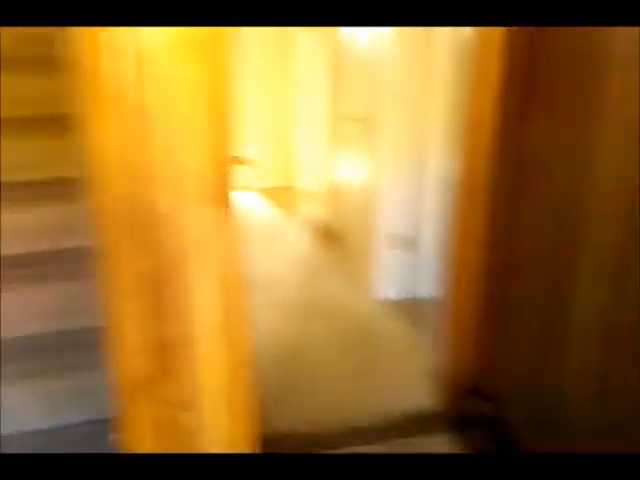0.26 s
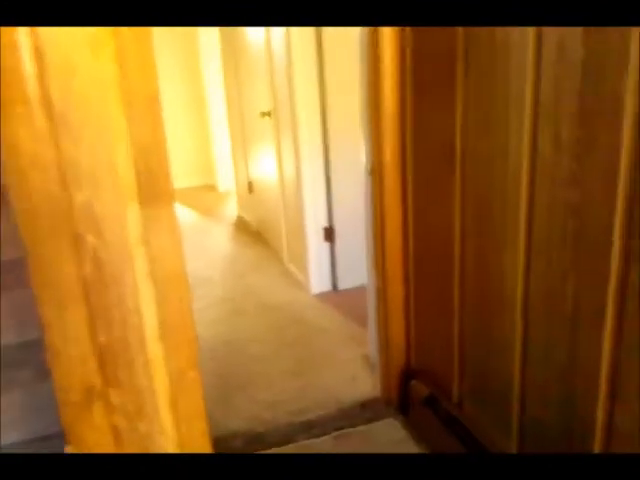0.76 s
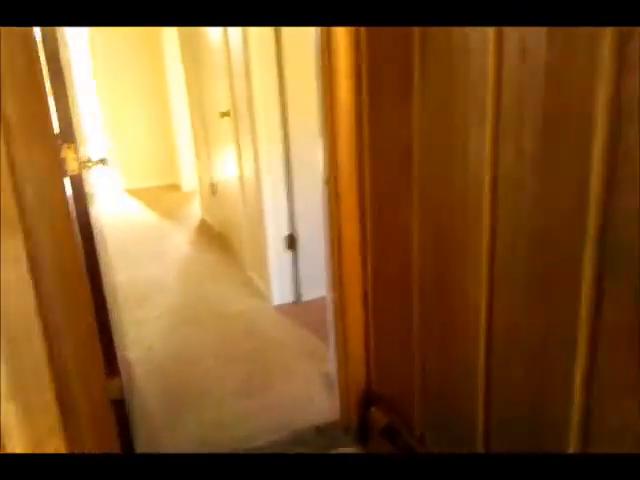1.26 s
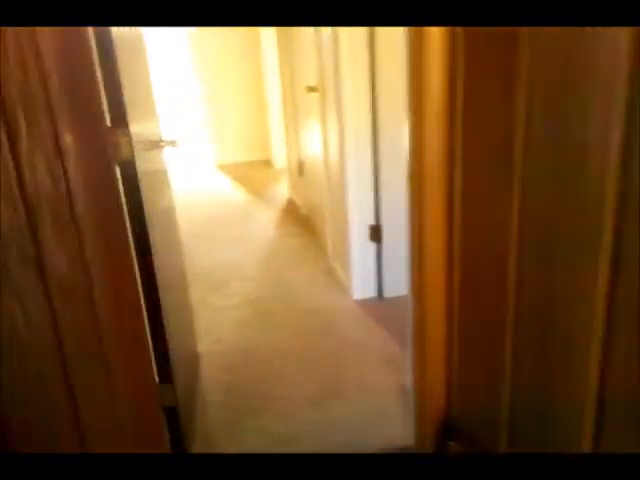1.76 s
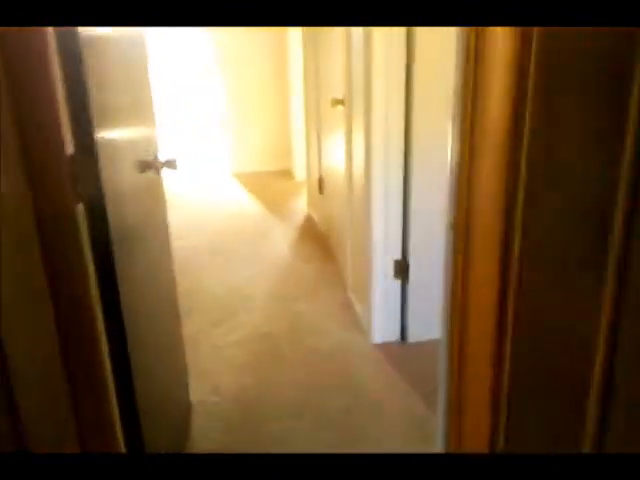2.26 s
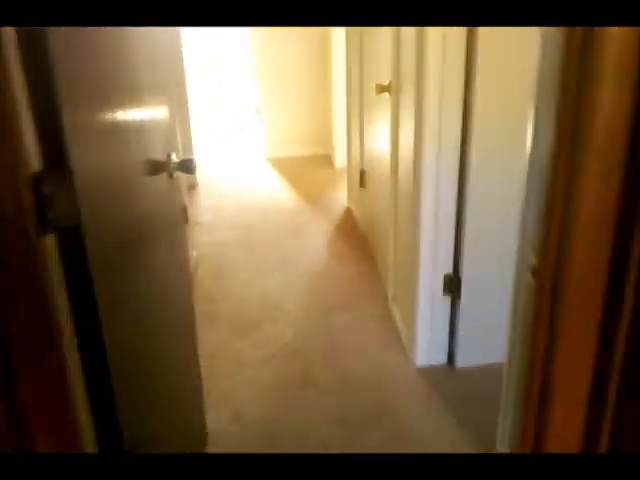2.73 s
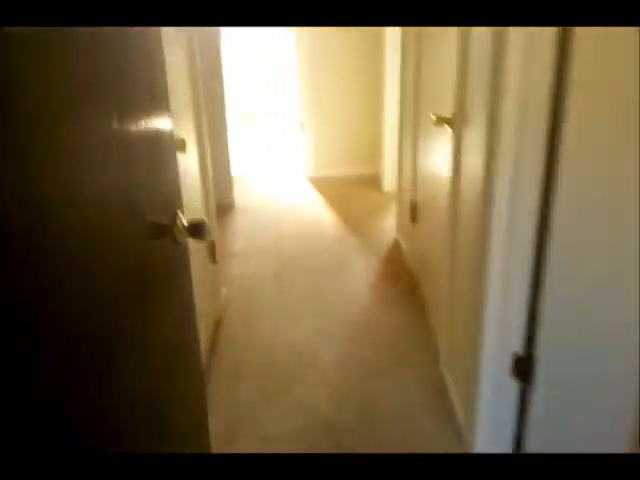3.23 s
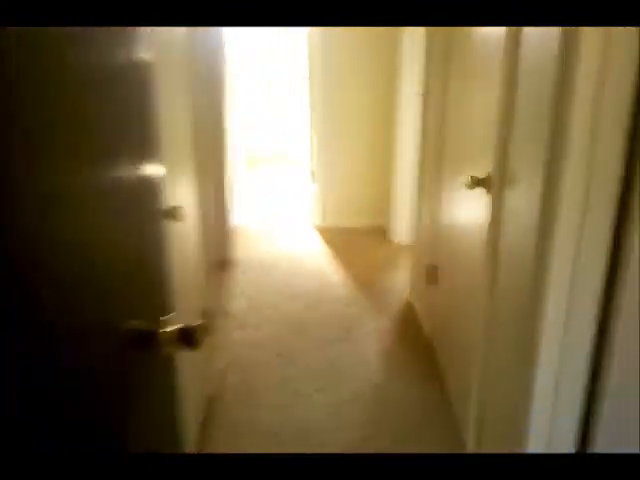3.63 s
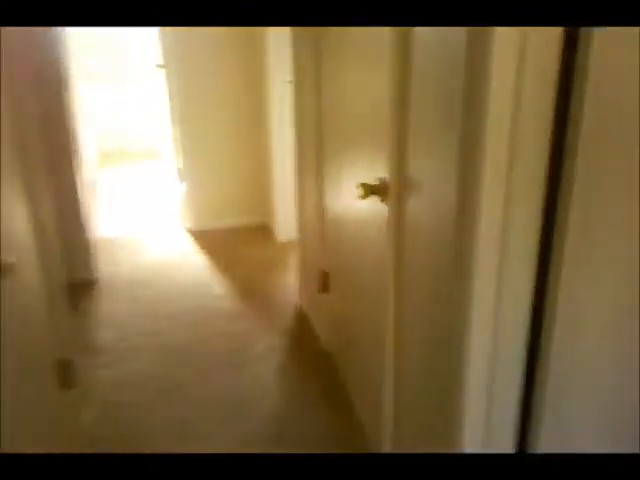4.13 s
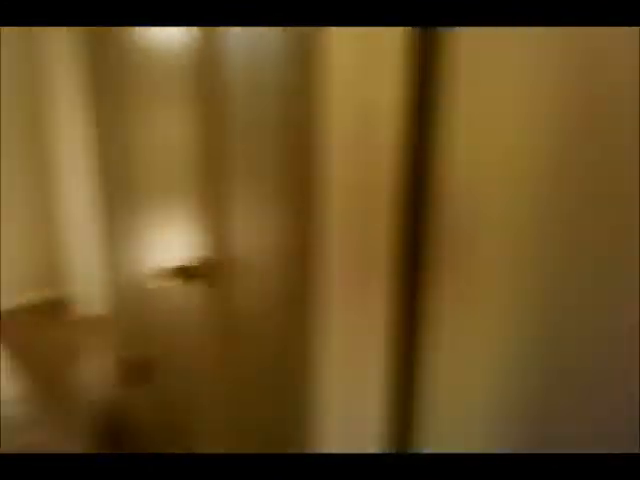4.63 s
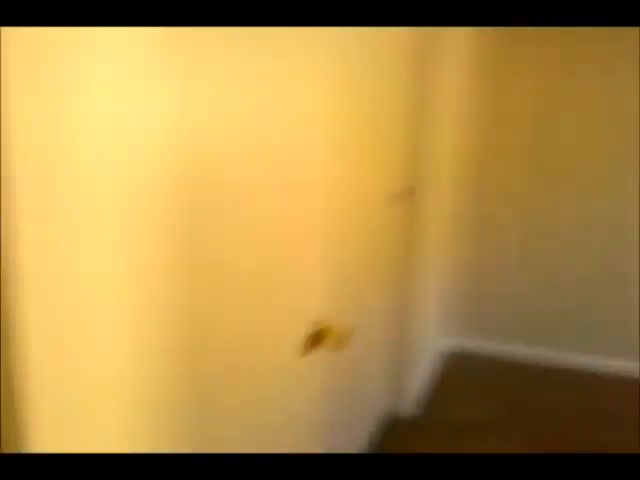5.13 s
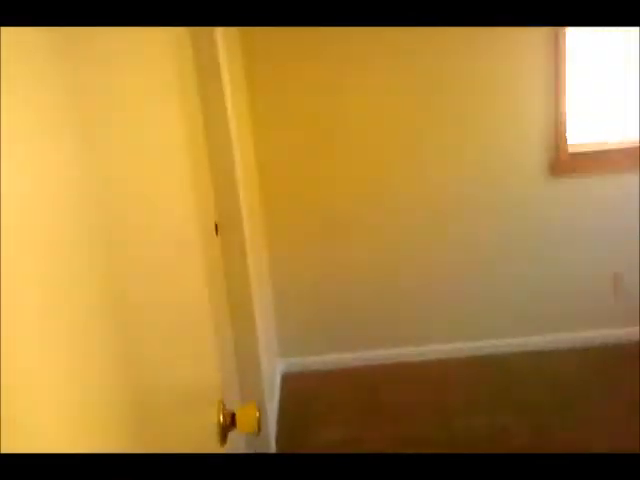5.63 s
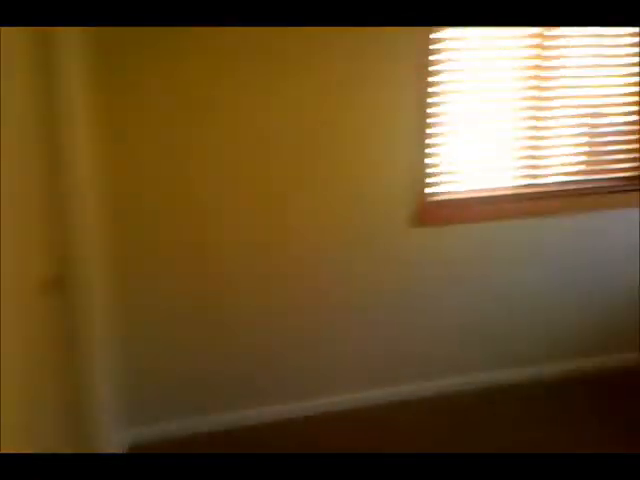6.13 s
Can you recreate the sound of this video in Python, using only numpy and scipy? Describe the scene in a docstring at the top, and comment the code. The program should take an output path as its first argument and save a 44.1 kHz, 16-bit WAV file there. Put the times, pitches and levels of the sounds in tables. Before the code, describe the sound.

A wooden door bumps at once, a quick clattering double knock followed by a small high metallic ping. A faint low appliance hum and still-air hiss sit beneath, the hum soon fading. A hand slides brightly on a handheld camera, whose case snaps in dry ticks. Then soft irregular scuffs and thuds cross carpeted boards with trouser swishes, in a small, slightly reverberant hallway.

```python
"""Someone carries a small camera through a quiet carpeted house.
An appliance hums in the first room, a tone and a rumble that fade as the walker leaves, over hissing still air.
At once a wooden door bumps, as decaying panel modes under noise bursts, and its metal fitting pings with close modes.
Then a hand slides on the camera, as bright noise, and its case ticks in brief dying tones.
Next soles scuff and soft steps thud on boards under carpet; soles drag, trousers swish and boards faintly bump."""
import sys
import numpy as np
from scipy import signal
from scipy.fft import rfft, irfft
from scipy.io import wavfile

SR = 44100
rng = np.random.default_rng(int(sys.argv[2]) if len(sys.argv) > 2 else 0)


def unload_audio(sound):
    """Save the sound as a 16-bit wav file, at the path given as the first command line argument."""
    columns = np.transpose(np.atleast_2d(sound))
    # keep every value between -1 and 1, then stretch to whole-number steps
    steps = np.round(np.clip(columns, -1, 1) * 32767)
    wavfile.write(sys.argv[1], SR, steps.astype(np.int16))


N = 281358
TIME = np.arange(N) / SR

# Still air and hiss, relative spectral density: frequency_hz, density_db (per Hz)
AIR_SPECTRUM = [(25, -44), (60, -24), (100, -9), (170, 0), (330, -1), (600, -6), (1200, -9.5), (2500, -13),
                (5000, -15), (7000, -16)]
AIR_DB = -64
# Low rumble of the appliance, relative spectral density: frequency_hz, density_db (per Hz)
RUMBLE_SPECTRUM = [(20, -46), (38, -1.5), (56, 0), (85, -7), (120, 4.5), (250, -24), (1000, -42)]
RUMBLE_DB, RUMBLE_FADE_DB_PER_S = -79.5, 5
HUM_HZ, HUM_DB, HUM_FADE_DB_PER_S = 246, -68, 14
LEAVE_S = 1.19  # the walker starts to leave the appliance behind

# Knocks of the door: start_s, panel_db, clatter_db, clatter_tilt_db (per octave), rise_s, t60_s
DOOR_BUMPS = [(0.0, -31, -33.5, 1, 0.0017, 0.38), (.028, -30.5, -23, 1.5, 0.0075, 0.16),
              (.06, -42, -40, -3, 0.0043, 0.78), (.157, -40, -53.5, -1.5, 0.0094, 1)]
# Modes of the door panel: frequency_hz, level_db, t60_s
DOOR_MODES = [(78, -14, 0.29), (141.3, -19, 0.47), (199.7, -2, 0.54), (280.3, -5, 0.37), (336, -1.5, 0.21),
              (400, -2.5, 0.3), (463, -4, 0.18), (616, -12, 0.25), (1436, -6, 0.083)]
# Clatter of the door, relative spectral density: frequency_hz, density_db (per Hz)
CLATTER_SPECTRUM = [(30, -45), (90, -5), (200, 4), (400, -1.5), (850, -2), (1400, -2.5), (2200, -10),
                    (3100, -6.5), (4000, -7), (5000, -14.5), (7000, -23.5)]
# Close modes of the metal fitting: frequency_hz, level_db, t60_s
METAL_MODES = [(5780, -11, .07), (5910, -4, .15), (5997, -2, .16), (6064, 0, .15), (6105, -6, .11),
               (6290, -11, .06)]
PING_S, PING_DB = .148, -27

# Slides of the hand on the camera: start_s, length_s, level_db, surge_db (as the grip lets go)
HAND_SLIDES = [(0.494, 0.326, -48, 11), (0.885, 0.072, -62.5, -5), (1.267, 0.061, -55.5, 10)]
# Hiss of sliding skin, relative spectral density: frequency_hz, density_db (per Hz)
SKIN_SPECTRUM = [(100, -19), (500, -11.5), (1100, -8.5), (2000, -5), (2500, -3.5), (3000, 2.5), (4200, 0.5),
                 (5400, 0.5), (6600, 6), (7500, 0.5)]
SLIDE_ATTACK_S, SLIDE_SURGE_S, SLIDE_RELEASE_S = 0.022, 0.026, .004
# Ticks of the camera case: start_s, level_db, ring_hz
CASE_TICKS = [(.5639, -11.5, 2440), (0.8974, -26, 2660), (1.3118, -27, 4700), (1.3263, -16.5, 3900),
              (2.3238, -20, 4260), (3.3255, -23.5, 2520), (3.5458, -31.5, 2530), (3.859, -35, 2300),
              (5.092, -33, 2300), (5.347, -28, 2460), (5.489, -26, 5900), (6.169, -29.5, 5000)]
# Low modes of the case shell: share (of ring_hz), level_db, t60_s
CASE_MODES = [(.25, -24.5, 0.012), (.57, -15.5, 0.0049)]
TICK_CYCLES = 8.5  # the main ring falls 60 dB in this many cycles

# Light scuffs of a sole: start_s, level_db, t60_s
SOLE_SCUFFS = [(.812, -56.5, 0.23), (1.746, -52, 0.064), (1.779, -54, .07), (2.587, -57, .06),
               (2.862, -56, 0.18), (2.984, -44.5, 0.18), (3.044, -50.5, 0.1), (3.077, -46.5, 0.2),
               (3.162, -52, 0.13), (3.25, -56, 0.2), (3.313, -46.5, 0.082), (3.521, -54.5, .06),
               (3.82, -50, 0.091), (4.951, -56.5, 0.075), (5.371, -41, .13)]
SCUFF_RISE_S, SCUFF_TILT_DB = .0035, 1.23  # tilt per octave
SCUFF_THUD_DB = -13  # relative to the scuff, which barely loads the boards
# Footfalls that take the body's weight: start_s, thud_db, sole_db, sole_tilt_db (per octave), t60_s
FOOTFALLS = [(1.487, -56.5, -62, -2, 0.18), (2.25, -50.5, -61, -6, .14), (2.272, -55, -50, -2, 0.17),
             (2.375, -51, -56, -3.5, 0.2), (2.733, -58, -52, -2, .09), (3.948, -42.5, -40.5, 0.7, .12),
             (3.997, -51, -51, -11, .1), (4.168, -45.5, -42.5, -1.5, 0.24), (4.186, -42.5, -51.5, -2, 0.36),
             (4.657, -45.5, -45, 1.5, 0.12), (5.112, -56, -48, -1.5, 0.1), (5.793, -60, -50.5, 0, 0.13),
             (6.113, -55.5, -59.5, -2, 0.5), (6.215, -54.5, -69, -7, .15)]
STEP_RISE_S = 0.002
# Modes of the floor boards: frequency_hz, level_db, t60_s
BOARD_MODES = [(124, -13, 0.092), (149.8, 3, 0.17), (173.5, -4.5, 0.11), (206, 3, 0.15), (235, -5.5, 0.14),
               (334.4, -14.5, 0.27), (801, -10, 0.22)]
# Sole against carpet, relative spectral density: frequency_hz, density_db (per Hz)
SOLE_SPECTRUM = [(30, -44), (70, -20), (145, 0), (330, 5), (520, 1), (820, 0), (1400, -2), (2000, -7),
                 (3200, -4), (4800, -10), (7000, -18.5)]

# Swings of a leg: full_speed_s, build_up_s, hold_s, fade_s, drag_db, swish_db
LEG_SWINGS = [(1.521, 0.34, 0.06, 0.79, -63.5, -62), (1.778, 0.11, 0.036, 0.29, -55, -59),
              (1.895, .1, 0.077, 0.2, -57.5, -56), (2.34, .1, 0.19, .4, -62, -63),
              (2.702, 0.27, .06, 0.075, -51.5, -54), (2.96, 0.14, 0.22, 0.35, -65.5, -66.5),
              (3.66, 0.79, 0.26, 0.86, -64, -65), (4.123, 0.14, 0.022, 0.14, -60.5, -55.5),
              (4.593, 0.017, 0.11, 0.11, -50, -47.5), (4.76, 0.89, 0.032, 0.39, -60, -63.5),
              (5.302, 0.64, 0.29, 0.7, -58.5, -64.5), (6.3, 0.3, .08, .2, -59.5, -66)]
SWING_RANGE_DB = 21.5  # gained over the build-up, lost over the fade
# Sole dragging over the pile, relative spectral density: frequency_hz, density_db (per Hz)
DRAG_SPECTRUM = [(30, -48), (60, -37), (130, -12.5), (310, -2.5), (450, -3), (650, -5), (1000, -7.5),
                 (1500, -8), (2200, -17), (4000, -31)]
# Trouser cloth, relative spectral density: frequency_hz, density_db (per Hz)
SWISH_SPECTRUM = [(600, -2.5), (1500, -15), (2300, 4), (3300, 5.5), (4200, 4), (5200, 1.5), (7000, -3.5)]
SETTLE_FROM_S, SETTLES_PER_S, SETTLE_DB = 2.3, 15, -65

# Decay of the carpeted hallway: frequency_hz, t60_s
ROOM_DECAY = [(100, .5), (300, .5), (1000, .45), (3000, .38), (6000, .24)]
BASS_HZ, EDGE_HZ = 42.4, 7080  # lower and upper edges of the camera's band


def amp(db):
    """Logarithmic level: decibels to gain."""
    return 10 ** (np.asarray(db) / 20)


def evened(x):
    """Mean power: scales a signal to rms 1."""
    return x / np.sqrt(np.mean(x ** 2) + 1e-20)


def read(points, hz):
    """Logarithmic pitch: interpolates a table along a log-frequency axis."""
    table_hz, value = np.transpose(points)
    return np.interp(np.log(hz + 1), np.log(table_hz + 1), value)


def add(mix, s, sound):
    """Superposition: adds a sound to the mix, in place, from time s."""
    part = mix[max(round(s * SR), 0):][:len(sound)]
    part += sound[:len(part)]


def colour(x, spectrum, tilt_db=0):
    """Spectral shaping: filters x by a spectrum, tilted per octave about 1 kHz, to rms 1."""
    hz = np.fft.rfftfreq(len(x), 1 / SR)
    octaves = np.log2(np.maximum(hz, 200) / 1000)  # no further tilt below 200 Hz
    gain = amp(read(spectrum, hz) + tilt_db * octaves)
    return evened(irfft(rfft(x) * gain, len(x)))


def wander(size, rate_hz):
    """Low-passed noise: slow random movement of rms 1 without a mean."""
    hz = np.fft.rfftfreq(size, 1 / SR)
    lowpass = np.exp(-(hz / rate_hz) ** 2) * (hz > 0)
    return evened(irfft(rfft(rng.standard_normal(size)) * lowpass, size))


def friction(size, clump_db, clump_hz):
    """Stick-slip: countless fibres snapping free, as noise whose level wanders in clumps."""
    return rng.standard_normal(size) * amp(clump_db * wander(size, clump_hz))


def ring(modes, t, spread=0.):
    """Modal decay: dying sines, each shifted a little by where the blow lands."""
    total = np.zeros(len(t))
    for hz, db, t60 in modes:
        shifted_hz = hz * (1 + spread * rng.uniform(-1, 1))
        total += amp(db - 60 * t / t60) * np.sin(2 * np.pi * shifted_hz * t)
    return total


def walls(x, echo_db=-18, count=5):
    """Early reflection: close walls and doors return single echoes that differ from spot to spot."""
    out = x.copy()
    delays_s = rng.uniform(.002, .018, count)
    signs = rng.choice([-1, 1], count)
    for delay_s, sign in zip(delays_s, signs):
        add(out, delay_s, sign * amp(echo_db) * x)
    return out


def blows(rows, modes, spectrum, spread, clump_db, push_s):
    """Impact excitation: each blow rings the wood's modes under a grainy burst from the contact."""
    out, t = np.zeros(N), np.arange(SR // 2) / SR
    for s, wood_db, burst_db, tilt_db, rise_s, t60 in rows:
        rise_s = max(rise_s, 1e-3)
        contact = np.minimum(t / rise_s, 1) * amp(-60 * np.maximum(t - rise_s, 0) / t60)
        grains = friction(len(t), clump_db, clump_hz=510)
        burst = colour(grains, spectrum, tilt_db) * contact
        push = 1 - np.exp(-t / push_s)  # the weight arrives gradually
        wood = ring(modes, t, spread) * push
        add(out, s, amp(wood_db) * wood + amp(burst_db) * walls(burst))
    return out


def house():
    """Steady sources and distance: air hiss stays, while the wavering hum and rumble are left behind."""
    gone_s = np.maximum(TIME - LEAVE_S, 0)
    air = colour(rng.standard_normal(N), AIR_SPECTRUM) * amp(AIR_DB + .5 * wander(N, 11))
    rumble_gain = amp(RUMBLE_DB - RUMBLE_FADE_DB_PER_S * gone_s)
    rumble = colour(rng.standard_normal(N), RUMBLE_SPECTRUM) * rumble_gain
    turns = np.cumsum(HUM_HZ + 5 * wander(N, 20)) / SR
    hum_gain = amp(HUM_DB - HUM_FADE_DB_PER_S * gone_s + 2 * wander(N, 27))
    hum = np.sqrt(2) * np.sin(2 * np.pi * turns) * hum_gain
    return air + rumble + hum


def bumps():
    """Impact on a panel: each knock of the door rings its modes under a clatter."""
    return blows(DOOR_BUMPS, DOOR_MODES, CLATTER_SPECTRUM, spread=0.017, clump_db=3.5, push_s=0.0046)


def ping():
    """Beating: a small metal fitting on the door rings with close modes."""
    out, t = np.zeros(N), np.arange(SR // 2) / SR
    swell = 1 - np.exp(-(t / 0.0038) ** 2)
    add(out, PING_S, amp(PING_DB) * ring(METAL_MODES, t) * swell)
    return out


def slide(s, length, db, surge_db):
    """Sliding speed sets level: skin slips, slides evenly, speeds up and lifts off (gain over time)."""
    past_end = TIME - s - length
    attack = np.clip((TIME - s) / SLIDE_ATTACK_S, 0, 1)
    surge = amp(db + surge_db * np.exp(np.minimum(past_end, 0) / SLIDE_SURGE_S))
    release = np.exp(-np.maximum(past_end, 0) / SLIDE_RELEASE_S)
    return attack * surge * release


def hand():
    """Dry friction: skin slides on the camera with a bright hiss."""
    hiss = colour(friction(N, clump_db=0.6, clump_hz=248), SKIN_SPECTRUM)
    return hiss * sum(slide(*row) for row in HAND_SLIDES)


def ticks():
    """Sudden release of strain: the gripped plastic case snaps, ringing for a few cycles."""
    out, t = np.zeros(N), np.arange(SR // 20) / SR
    onset = 1 - np.exp(-(t / 0.00064) ** 2)
    for s, db, hz in CASE_TICKS:
        modes = [(hz, 0, TICK_CYCLES / hz)]
        modes += [(share * hz, low_db, t60) for share, low_db, t60 in CASE_MODES]
        add(out, s, amp(db) * ring(modes, t) * onset)
    return out


def footwork():
    """Impact on a floor: scuffs and steps are blows on the same carpeted boards."""
    scuffs = [(s, db + SCUFF_THUD_DB, db, SCUFF_TILT_DB, SCUFF_RISE_S, t60)
              for s, db, t60 in SOLE_SCUFFS]
    steps = [(s, thud_db, sole_db, tilt_db, STEP_RISE_S, t60)
             for s, thud_db, sole_db, tilt_db, t60 in FOOTFALLS]
    return blows(scuffs + steps, BOARD_MODES, SOLE_SPECTRUM, spread=0.046, clump_db=2.0, push_s=0.0072)


def swing(s, build, hold, fade):
    """Speed sets level: a leg gathers speed, keeps it briefly and slows (gain over time)."""
    before = np.maximum(s - TIME, 0) / max(build, 1e-3)
    after = np.maximum(TIME - s - hold, 0) / max(fade, 1e-3)
    return amp(-SWING_RANGE_DB * (before + after))


def legs():
    """Sliding friction: soles drag dully and unevenly over the pile while trouser legs brush."""
    swings = np.array([swing(*row[:4]) for row in LEG_SWINGS])
    drag_db, swish_db = np.transpose(LEG_SWINGS)[4:, :, None]
    # overlapping swings add in power
    drag_gain = np.linalg.norm(amp(drag_db) * swings, axis=0)
    swish_gain = np.linalg.norm(amp(swish_db) * swings, axis=0)
    drag = colour(friction(N, clump_db=2.5, clump_hz=62.4), DRAG_SPECTRUM) * drag_gain
    swish = colour(friction(N, clump_db=1.5, clump_hz=220), SWISH_SPECTRUM) * swish_gain
    return drag + swish


def settling():
    """Random excitation: shifting weight faintly nudges the hallway boards, once at random in each slot."""
    out, t = np.zeros(N), np.arange(SR // 2) / SR
    push = 1 - np.exp(-t / .012)
    for slot_s in np.arange(SETTLE_FROM_S, N / SR, 1 / SETTLES_PER_S):
        nudge = ring(BOARD_MODES, t, spread=.15) * push
        level_db = SETTLE_DB + 2.1 * rng.standard_normal()
        add(out, slot_s + rng.random() / SETTLES_PER_S, amp(level_db) * nudge)
    return out


def room(x):
    """Reverberation: a small carpeted hallway's sparse reflections, the treble dying first."""
    chosen = rng.random(SR) < 3000 / SR  # about 3000 reflections per second
    late = np.arange(SR) > .005 * SR
    taps = rng.choice([-1., 1.], SR) * chosen * late
    hz, t, bands = signal.stft(taps, SR, nperseg=256)
    decay = amp(-60 * t / read(ROOM_DECAY, hz)[:, None])
    tail = signal.istft(bands * decay, SR, nperseg=256)[1]
    return signal.fftconvolve(x, tail / np.linalg.norm(tail))[:N]


def scene():
    """Direct and reverberant sound: door, feet and legs excite the hallway; hand and case do not."""
    door = bumps() + ping()
    moving = footwork() + legs() + settling()
    hallway = amp(-15.5) * room(door) + amp(-10.5) * room(moving)
    return (house() + door + hand() + ticks() + moving + hallway)[None]


def record(dry):
    """Band limiting: the small camera passes little deep bass and no high treble."""
    highpass = signal.butter(2, BASS_HZ, "highpass", fs=SR, output="sos")
    thin = signal.sosfilt(highpass, dry)
    lowpass = signal.firwin(101, EDGE_HZ, window=("kaiser", 7), fs=SR)
    return signal.oaconvolve(thin, lowpass[None], "same")


dry = scene()
out = record(dry)
unload_audio(out)
```